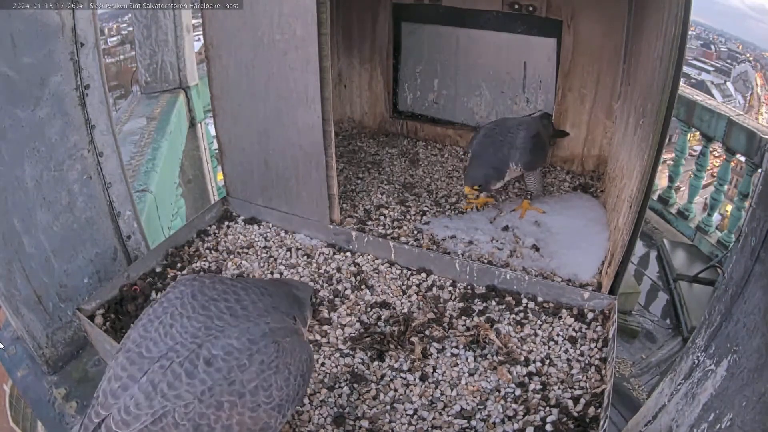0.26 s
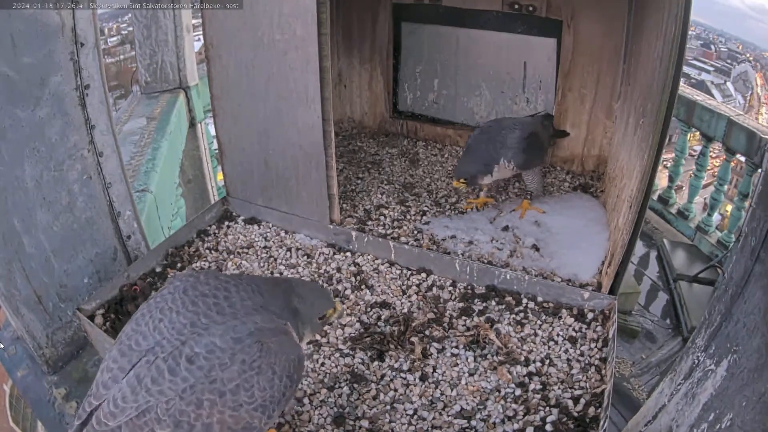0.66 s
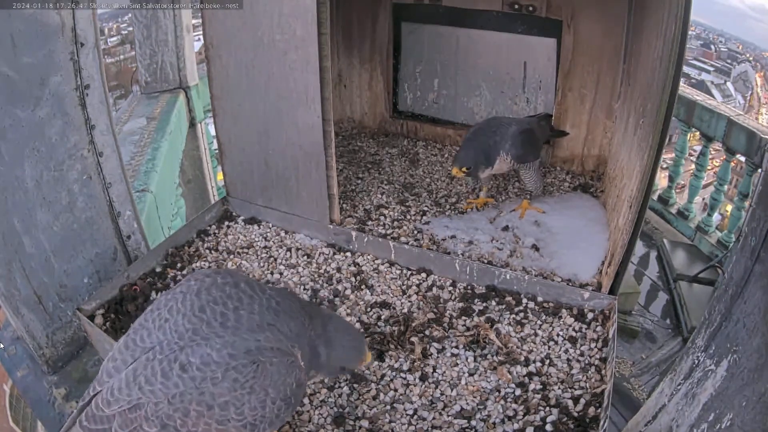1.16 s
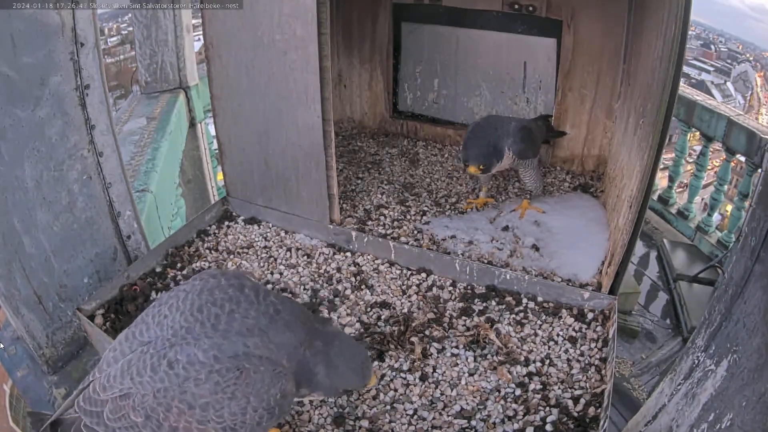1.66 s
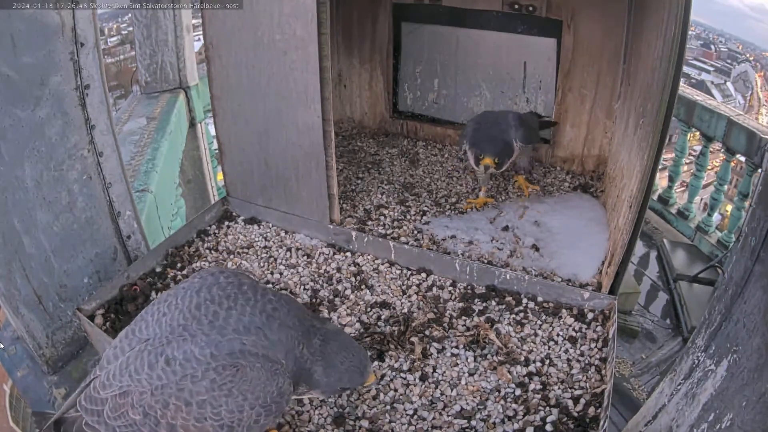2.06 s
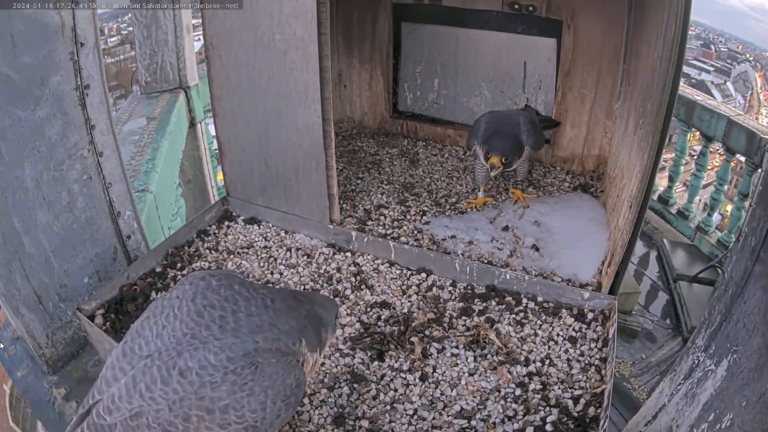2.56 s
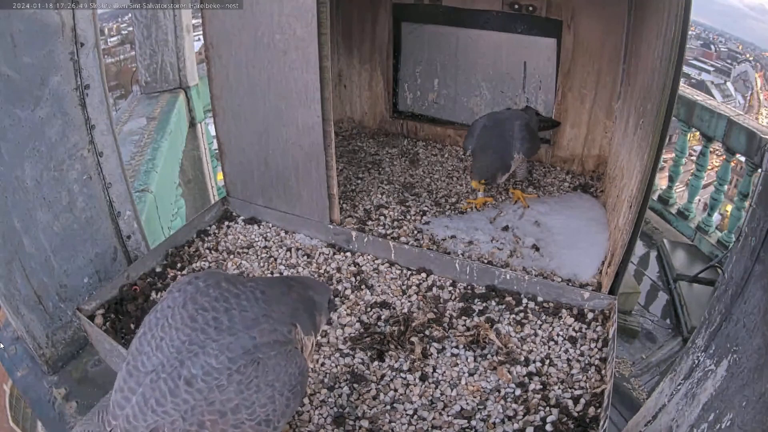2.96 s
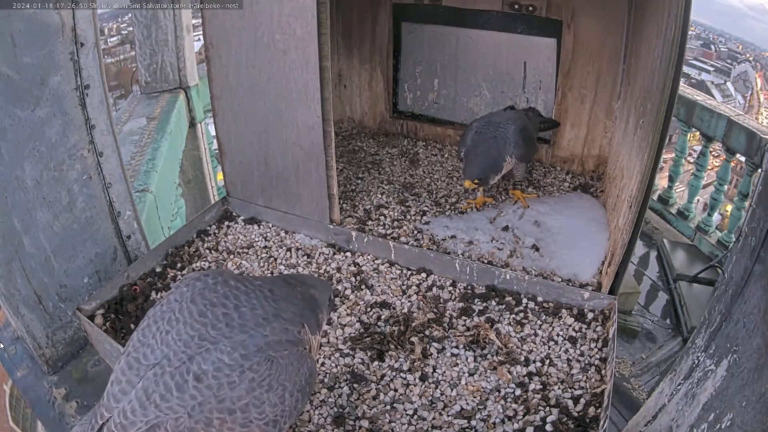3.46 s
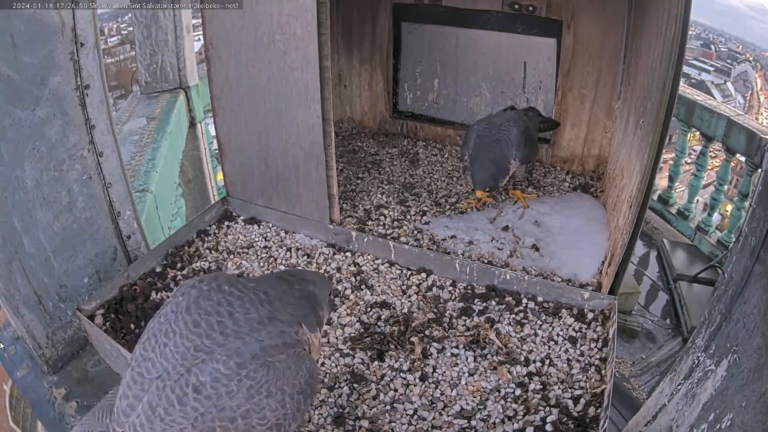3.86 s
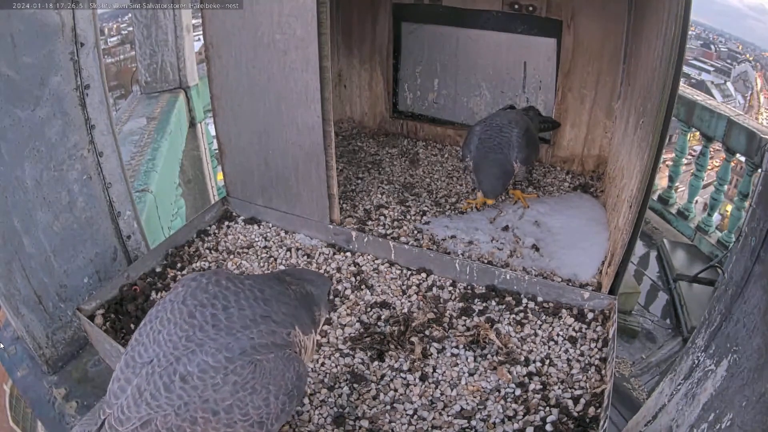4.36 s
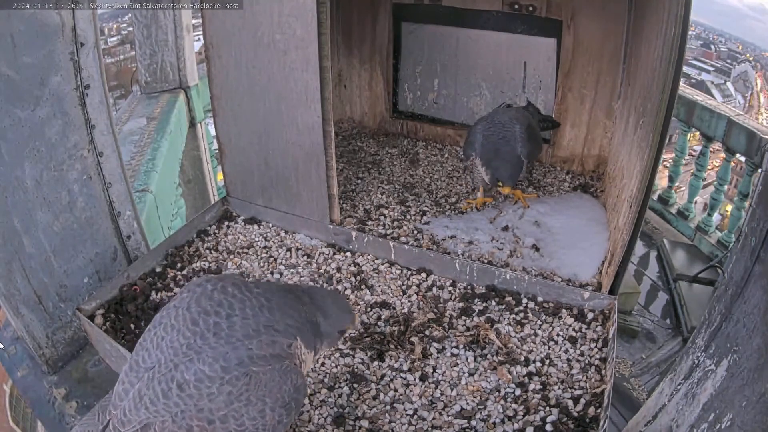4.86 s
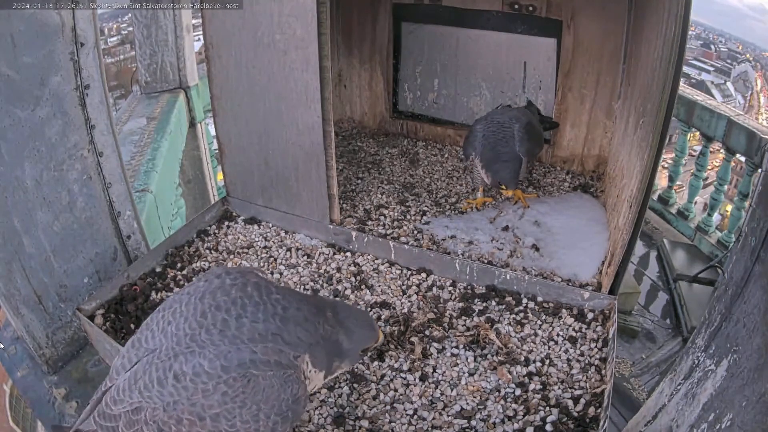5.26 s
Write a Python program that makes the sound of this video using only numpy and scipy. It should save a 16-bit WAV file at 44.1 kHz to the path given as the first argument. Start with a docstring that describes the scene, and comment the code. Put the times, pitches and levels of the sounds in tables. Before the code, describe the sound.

Sharp, squeaky chips from a falcon alternate with a second falcon's throaty clucks, a few brief calls every second, often in quick pairs. Some clucks crack into squeaks. The birds are near the microphone in a wooden nest box that adds a short echo, and the loudest calls distort slightly. Underneath lies a faint rumble of distant traffic, with a low engine drone in the first second that returns weakly at the end.

```python
"""A town rumbles far below a wooden nest box on a tower; an engine drones, mostly in the first second.
In the box one falcon chips: after a faint scratch and peep, its whistle drops a fifth and breaks into a
slowing rasp. A second falcon answers with hoarse clucks, air pulses that ring its throat and at times
break into squeaks. They trade calls to the end, when the drone swells again. The box adds short echoes
to every call, and the loudest peaks overload a small microphone close by."""
import sys
import numpy as np
from scipy import signal
from scipy.fft import rfft, irfft
from scipy.io import wavfile

SR = 44100
rng = np.random.default_rng(int(sys.argv[2]) if len(sys.argv) > 2 else 0)


def master(y):
    """Save y as 16-bit WAV."""
    cut = np.clip(np.atleast_2d(y).T, -1, 1)
    pcm = np.round(cut * 32767)  # scale
    wavfile.write(sys.argv[1], SR, pcm.astype(np.int16))


N = 242550

# chips of the first falcon: start_s, pitch_hz, whistle_s, high_note_db, low_note_db, rasp_db, overtone_db
CHIPS = [ (0.1029, 3850, 0.018, -6, -10, -15.5, 7.5), (0.195, 3014, 0.039, -11.5, -10.5, -27, 5.5),
         (0.383, 3763, .027, -7.5, -15.5, -24, 9), (0.9345, 3742, 0.024, -7.5, -3.5, -23.5, -4.5),
         (0.971, 3045, .035, -8.5, -14.5, -27, 1), (1.541, 3173, 0.027, -16.5, -13.5, -29, 2.5),
         (1.547, 3544, 0.024, -10, -3, -13.5, 0.5), (2.031, 3837, .020, -3, -9, -14, 5.5),
         (2.271, 3180, 0.035, -14.5, -14.5, -23, 4.5), (2.689, 3726, 0.0094, -8, -4, -14.5, -9),
         (2.929, 3154, 0.041, -12.5, -15, -35.5, 5), (2.973, 3746, .022, -4, -5.5, -18, 4),
         (3.438, 3850, .019, -4, -6, -15, 3), (3.859, 3163, .026, -10.5, -10.5, -13.5, 8.5),
         (4.22, 3645, 0.021, -11.5, -13, -17.5, 13), (4.751, 3768, 0.016, -10, -11, -13.5, 10),
         (5.002, 3125, 0.032, -8, -11.5, -25.5, 3), (5.236, 3623, 0.022, -9.5, -9.5, -19, 9)]
# throat resonances that shape the clucks and the breath in all whistles: centre_hz, width_hz, gain_db
THROAT = [(410, 53, -17), (800, 33, -2.5), (1364, 400, 5), (1525, 160, 6.5), (1908, 75, 14.5),
          (2815, 87, 4.5), (3230, 140, -4.5), (3950, 490, -10.5)]


def from_db(db):
    """Amplitude grows tenfold with every 20 dB."""
    return 10 ** (np.asarray(db) / 20)


def unit_rms(x):
    """Normalisation: scale a signal to a mean power of 1."""
    return x / np.sqrt(np.mean(x ** 2) + 1e-20)


def add(out, start_s, sound):
    """Superposition: a sound adds to the mix from its start time on."""
    at = max(int(start_s * SR), 0)
    out[at:at + len(sound)] += sound[:N - at]


def low_pass(x, hz, order=2):
    """Butterworth roll-off: 6 dB per octave for each order, above the cutoff."""
    return signal.sosfilt(signal.butter(order, min(hz, .45 * SR), fs=SR, output="sos"), x)


def coloured_noise(spectrum):
    """Spectral shaping: white noise weighted by a curve of level against log frequency; rms 1."""
    hz, db = np.transpose(spectrum)
    bin_hz = np.maximum(np.arange(N // 2 + 1) * SR / N, 1)
    gain = from_db(np.interp(np.log(bin_hz), np.log(hz), db))
    return unit_rms(irfft(rfft(rng.standard_normal(N)) * gain, N))


def call_time(size=4096):
    """Sample times in seconds, enough for one call."""
    return np.arange(size) / SR


def flutter(corner_hz):
    """Random modulation over one call, rolling off above a corner frequency; rms 1."""
    size = len(call_time())
    bin_hz = np.arange(size // 2 + 1) * SR / size
    return unit_rms(irfft(rfft(rng.standard_normal(size)) / np.hypot(1, (bin_hz / corner_hz) ** 2)))


def gate(length_s, attack_s, release_s):
    """A driven vibration builds while air flows, then decays exponentially."""
    t = call_time()
    rise = np.sin(np.pi / 2 * np.minimum(t / attack_s, 1)) ** 2
    return rise * np.exp(-np.maximum(t - length_s, 0) / release_s)


def town(rumble_db=-45.5, engine_hz=112, engine_gain_db=-4, wander=0.043):
    """Traffic gives broadband rumble; an engine's wandering speed frequency-modulates its drone."""
    # spectrum of the rumble: frequency_hz, relative_db
    rumble_spectrum = [(20, 0.5), (50, 0.5), (115, -1), (165, -12.5), (240, -11), (400, -28.5),
                       (650, -28.5), (1150, -23.5), (2050, -26), (3100, -36), (4500, -46), (9000, -52),
                       (16000, -60.5)]
    # envelope of the distant drone: time_s, relative_db
    drone_envelope = [(0.0, -41), (0.04, -37), (0.37, -52.5), (0.57, -36.5), (0.95, -54), (4.84, -57),
                      (5.5, -45.5)]
    drone_db = np.interp(np.arange(N) / SR, *np.transpose(drone_envelope)) + engine_gain_db
    drone_hz = engine_hz * (1 + wander * unit_rms(low_pass(rng.standard_normal(N), 8.7)))
    drone = from_db(drone_db) * np.sqrt(2) * np.sin(2 * np.pi * np.cumsum(drone_hz) / SR)
    return from_db(rumble_db) * coloured_noise(rumble_spectrum) + drone


def nest_box(x, scatter_db=-9, scatter_t60_s=0.059, tower_db=-38, tower_t60_s=0.23):
    """Convolution adds the box's reflections and standing waves, and the tower's faint reverberation."""
    # early reflections from the nearest boards: delay_s, gain_db
    reflections = [(.0016, -26.5), (.0043, -19), (.0074, -11.5)]
    # standing waves of the box: frequency_hz, gain_db, t60_s
    box_modes = [(243.6, -5, 0.053), (387.4, -8.5, 0.031), (704, 1.5, 0.047), (1220, -2, 0.059),
                 (1603, -2.5, 0.024), (1970, -13, 0.11), (2400, -15.5, 0.1), (3240, -16, 0.091),
                 (3800, -24.5, 0.14), (4600, -18, .16), (4760, -2.5, .06), (5260, -3.5, 0.14),
                 (6100, 2.5, 0.067), (7540, -1, 0.053), (7540, 5.5, 0.036), (8300, 0, 0.026)]
    # spectrum of the tower's reverberation: frequency_hz, relative_db
    tower_spectrum = [(200, -9.5), (700, 4.5), (1300, 4.5), (2200, -10.5), (3200, -9.5), (5000, -32),
                      (9000, -13), (14000, -38.5)]
    t = np.arange(N) / SR
    scatter = unit_rms(rng.standard_normal(N) * from_db(-60 * t / scatter_t60_s) * (t > .0007))
    tower = unit_rms(coloured_noise(tower_spectrum) * from_db(-60 * t / tower_t60_s) * (t > .015))
    response = (from_db(scatter_db) * scatter + from_db(tower_db) * tower) / np.sqrt(N)
    response[0] = 1  # direct sound
    for delay_s, db in reflections:
        response[int(delay_s * SR)] += from_db(db)
    for hz, db, t60_s in box_modes:
        damping = np.log(1000) / t60_s
        ring = np.exp(-damping * t[:SR]) * np.cos(2 * np.pi * hz * t[:SR])
        response[:SR] += from_db(db) * 2 * damping / SR * ring
    return signal.fftconvolve(x, response)[:N]


def throat(x, resonances):
    """Formants: parallel resonators of alternating sign, which beak and tongue shift for each call."""
    out = 0
    for k, (hz, width_hz, db) in enumerate(resonances):
        hz, db = hz * rng.normal(1, .025), db + rng.normal(0, 2)
        radius = np.exp(-np.pi * width_hz / SR)
        feedback = [1, -2 * radius * np.cos(2 * np.pi * hz / SR), radius ** 2]
        ring = (1 - radius ** 2) / 2 * signal.lfilter([1, 0, -1], feedback, x)
        out = out + (-1) ** k * from_db(db) * ring
    return out


def by_tension(hz, slack, taut, slack_hz=3100, taut_hz=3750):
    """Pitch rises with tension in the syrinx; a quality follows linearly from slack to taut."""
    return np.interp(hz, [slack_hz, taut_hz], [slack, taut])


def whistle(hz, jitter, shimmer, breath_db, overtone_db, doubling=0.13):
    """Self-oscillation of the syrinx: a tone unsteady in pitch and strength, with turbulence; rms 1."""
    # overtones of the syrinx: harmonic_number, relative_db
    overtones = [(2, -20), (3, -27), (4, -32.5)]
    phase = 2 * np.pi * np.cumsum(hz * (1 + jitter * flutter(1100))) / SR
    tone = np.sin(phase) + sum(from_db(db + overtone_db) * np.sin(round(k) * phase) for k, db in overtones)
    # period doubling: strong and weak cycles alternate, adding lines halfway between the harmonics
    strength = 1 + shimmer * (flutter(270) + doubling * np.cos(phase / 2))
    turbulence = unit_rms(throat(flutter(6700), THROAT))
    return unit_rms(unit_rms(tone * strength) + from_db(breath_db) * turbulence)


def hoarse_whistle(hz, hoarse_db, overtone_db):
    """Hoarseness is aperiodicity: jitter, shimmer and breath noise grow together."""
    hoarse = min(from_db(hoarse_db), 1)
    return whistle(hz, 0.15 * hoarse, 3 * hoarse, breath_db=hoarse_db - 5, overtone_db=overtone_db)


def rasp(rate_hz, resonances, rough, jitter, air, chest_db, hiss_db, top_hz=4500):
    """Source and filter: membranes slap shut unevenly, each time with a puff, and ring the throat."""
    cycles = np.cumsum(rate_hz * np.exp(jitter * rough * flutter(500))) / SR
    closures = np.diff(np.floor(cycles), prepend=-1)
    slaps = closures * np.sqrt(SR / rate_hz) * (1 + rough / 2 * np.tanh(flutter(900)))
    puffs = rng.standard_normal(len(cycles)) * (1 + np.cos(2 * np.pi * cycles))
    ringing = throat(slaps + air * rough * puffs, resonances)
    voice = unit_rms(low_pass(ringing, top_hz, order=8))
    # the pulsing airflow gives a soft fundamental, and a little air hisses past the beak
    return voice + from_db(chest_db) * np.sin(2 * np.pi * cycles) + from_db(hiss_db) * puffs


def lead_ins(peep_hz=6200, peep_s=.012, peep_rise=.04, spread_db=3):
    """Two faint transients precede each chip: a dry scratch of noise and a thin rising peep."""
    out, t = np.zeros(N), call_time()
    for start_s, hz, *_ in CHIPS:
        scratch = unit_rms(np.diff(flutter(2600), prepend=0)) * gate(0.006, attack_s=.001, release_s=.004)
        scratch *= from_db(by_tension(hz, slack=-59, taut=-54.5))
        glide_hz = peep_hz * rng.normal(1, .03) * (1 + peep_rise * np.minimum(t / peep_s, 1))
        peep = whistle(glide_hz, jitter=.02, shimmer=.4, breath_db=-20, overtone_db=0)
        peep *= from_db(by_tension(hz, slack=-72, taut=-51)) * gate(peep_s, attack_s=.004, release_s=.004)
        lead_s = by_tension(hz, slack=.051, taut=.073)
        add(out, start_s - lead_s, from_db(spread_db * rng.standard_normal()) * (scratch + peep))
    return out


def squeaks(sag_hz_per_s=5000):
    """A change of vibration regime: a cluck breaks into a short whistle whose pitch sags."""
    # squeaks of the second falcon: start_s, length_s, pitch_hz, level_db
    calls = [ (0.594, 0.0099, 2328, -13.5), (3.344, 0.035, 2350, -16), (4.59, 0.022, 2270, -16.5),
             (4.617, 0.017, 2580, -22), (4.634, 0.015, 2424, -10), (5.374, 0.019, 2670, -31.5),
             (5.39, 0.016, 2296, -11.5)]
    out, t = np.zeros(N), call_time()
    for start_s, length_s, hz, db in calls:
        glide_hz = hz + sag_hz_per_s * (length_s / 2 - np.minimum(t, length_s))
        tone = hoarse_whistle(glide_hz, hoarse_db=-19, overtone_db=3)
        add(out, start_s, from_db(db) * tone * gate(length_s, attack_s=0.0049, release_s=.004))
    return out


def clucks(first_hz=408.2, clear_hz=678.3, rough_hz=445.5, fade_db=5):
    """A pulse train excites the throat; it quickens in a clear cluck and stays slow in a rough one."""
    # clucks of the second falcon: start_s, length_s, relative_db, roughness (0 clear, about 1 rough)
    calls = [ (0.560, 0.031, -11.5, 0.61), (0.617, .018, -9, 0.94), (0.742, 0.029, -6, 0.14),
             (1.266, 0.021, -10, 0.73), (1.306, 0.031, -17, 0.81), (1.846, 0.032, -5.5, 0.09),
             (1.932, 0.019, -10.5, 0.85), (1.982, .024, -11.5, 0.75), (2.542, 0.038, -4, .48),
             (2.601, 0.03, -15.5, 0.72), (3.275, 0.037, -6, 0.46), (3.321, 0.022, -8, 0.68),
             (3.373, 0.0243, -14, 1), (3.74, 0.029, -7, 0.3), (4.565, 0.056, -10.5, 0.14),
             (4.625, 0.059, -13, 1.06), (5.335, 0.025, -26, 0.9), (5.351, 0.027, -8, 0.7),
             (5.399, 0.0257, -20, 1)]
    out, t = np.zeros(N), call_time()
    for start_s, length_s, db, roughness in calls:
        progress = np.minimum(t / length_s, 1)
        effort = np.sin(np.pi / 2 * np.minimum(1.5 * progress, 1)) ** 2
        last_hz = np.interp(roughness, [.4, .75], [clear_hz, rough_hz])
        rate_hz = first_hz + (last_hz - first_hz) * effort
        rough = np.clip(roughness ** 2 + .25 * (1 - effort) ** 2, 0, 1)  # effort steadies the pulses
        chest_db = -13 + 7 * effort * (1 - roughness)
        voice = rasp(rate_hz, THROAT, rough, jitter=.12, air=.5, chest_db=chest_db, hiss_db=-28)
        swell = gate(length_s, attack_s=0.2 * length_s, release_s=0.00086)
        add(out, start_s - .001, from_db(db - fade_db * (progress + 1.5)) * voice * swell)
    return out


def dying_rasp(length_s=0.031, first_hz=1200, last_hz=205, fade_db=16):
    """Relaxation pulses slow, sputter and fade as the air runs out; the fundamental fades least."""
    # throat resonances of the chipping falcon: centre_hz, width_hz, gain_db
    formants = [(420, 220, -16.5), (820, 73, 3), (1287, 170, 6), (1750, 540, 7.5), (2000, 400, 8),
                (3000, 510, 3), (3750, 1200, -6)]
    t = call_time()
    spent = np.minimum(t / length_s, 1)
    slowing_s = 0.009 * rng.uniform(.7, 1.6)
    rate_hz = (last_hz + (first_hz - last_hz) * np.exp(-t / slowing_s)) * np.exp(0.088 * flutter(120))
    creak = rasp(rate_hz, formants, rough=0.54, jitter=0.18, air=.85,
                 chest_db=-17 + 13 * spent, hiss_db=-21.5)
    sputter_db = 3 * flutter(110)
    envelope = gate(length_s, attack_s=0.00081, release_s=0.0039)
    return creak * from_db(-1 - fade_db * spent + sputter_db) * envelope


def chips(high_share=.41, register_ratio=2 / 3, swoop_s=0.0036, sag_s=0.0037, fade_db_per_s=330):
    """Register break: the whistle swoops onto its high note, jumps down a fifth, then becomes a rasp."""
    out, t = np.zeros(N), call_time()
    for start_s, hz, whistle_s, high_db, low_db, rasp_db, overtone_db in CHIPS:
        high_s = high_share * whistle_s
        high_hz = hz * (1 + 0.38 * np.exp(-t / swoop_s))
        high = hoarse_whistle(high_hz, by_tension(hz, slack=-19, taut=-22), overtone_db)
        high *= gate(high_s, attack_s=0.0078, release_s=0.01)
        low_hz = register_ratio * hz * (1 + 0.14 * np.exp(-t / sag_s))
        low = hoarse_whistle(low_hz, by_tension(hz, slack=-13, taut=-18), overtone_db)
        low *= gate(whistle_s - high_s, attack_s=0.0052, release_s=0.0027)
        add(out, start_s - .002, from_db(high_db - fade_db_per_s * t) * high)
        add(out, start_s + high_s - .001, from_db(low_db) * low)
        add(out, start_s + whistle_s - .002, from_db(rasp_db) * dying_rasp())
    return out


def scene():
    """Superposition: both birds reverberate in the box, and the town adds beneath them."""
    birds = chips() + lead_ins() + clucks() + squeaks()
    return (nest_box(birds) + town())[None]


def record(dry, treble_limit_hz=9500, cutoff_hz=15800):
    """Band limiting and saturation: the sound is dull above about 9.5 kHz, and loud peaks are flattened."""
    x = low_pass(dry, treble_limit_hz, order=20)
    ceiling = np.where(x > 0, .77, .7)  # asymmetric overload
    clipped = x / (1 + (x / ceiling) ** 16) ** (1 / 16)
    return signal.sosfilt(signal.ellip(10, .1, 80, cutoff_hz, fs=SR, output="sos"), clipped)


dry = scene()
out = record(dry)
master(out)
```